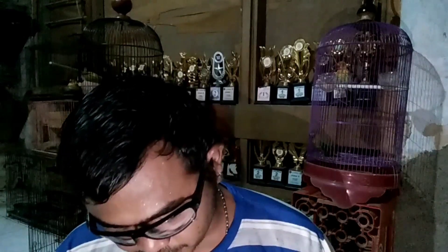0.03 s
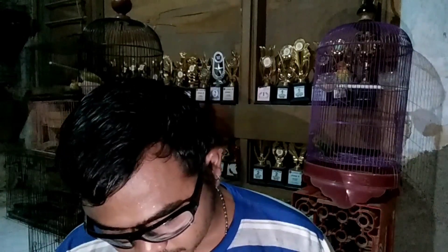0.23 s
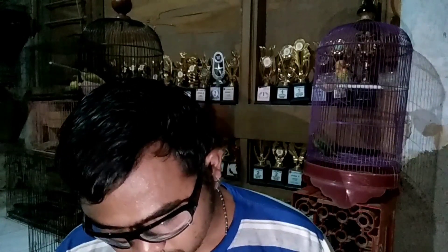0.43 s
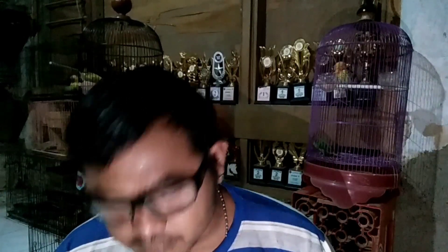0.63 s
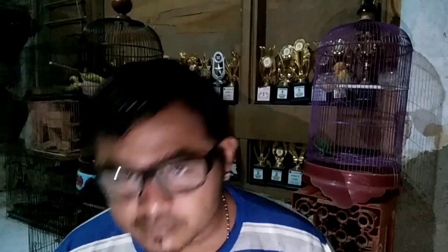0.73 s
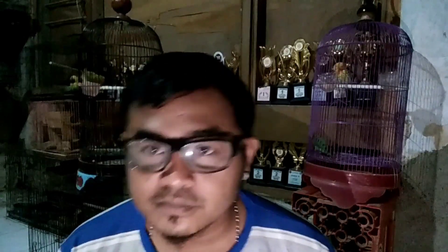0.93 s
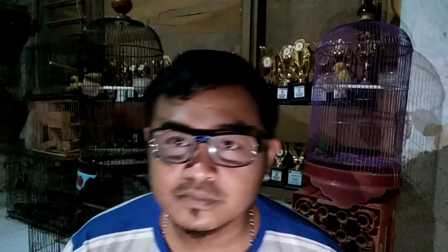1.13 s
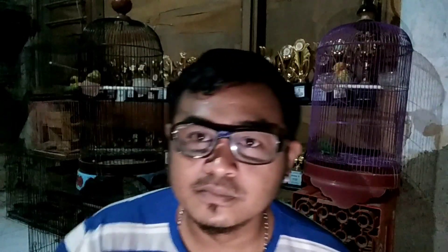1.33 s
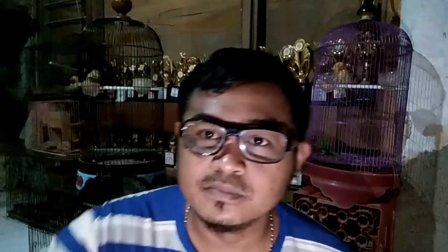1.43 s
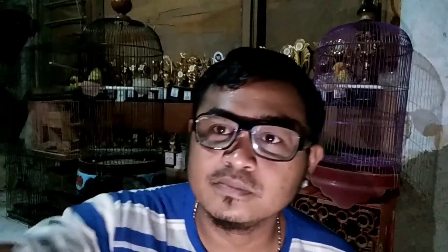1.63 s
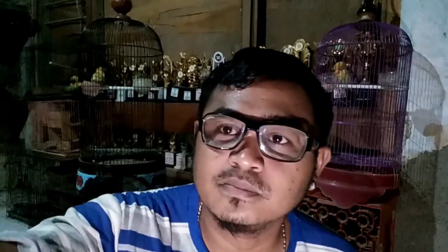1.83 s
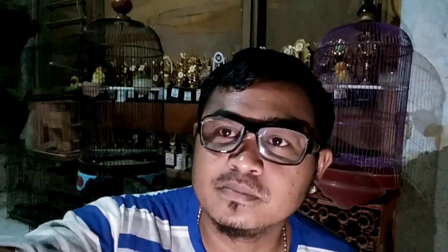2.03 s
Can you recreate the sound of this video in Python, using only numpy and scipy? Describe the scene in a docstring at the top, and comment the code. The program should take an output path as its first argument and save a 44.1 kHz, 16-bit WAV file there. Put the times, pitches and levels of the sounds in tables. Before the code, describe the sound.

Small caged parrots chirp sharply one at a time, with little cage clicks and faint rustling between, then break into dense shrill chatter until the end, over a quiet insect-like trill and low room rumble.

```python
"""Lovebirds call in a small hard-walled room with cages: five separate shrill chirps, then a loud run of
overlapping whistles and squawks. Each call is a gliding harmonic oscillator, frayed by random modulation;
squawks add throat resonances and rasping noise. Between calls the cages tick (noise cracks and decaying
modes) and rustle (swelling noise bands). Behind lie a thin, softly pulsing trill like a cricket's, made of
gated noise, faint low tones and a low room rumble of shaped noise."""
import sys
import numpy as np
from scipy import signal
from scipy.fft import rfft, irfft, next_fast_len
from scipy.io import wavfile
from scipy.ndimage import uniform_filter1d, minimum_filter1d, map_coordinates

SR = 44100
rng = np.random.default_rng(int(sys.argv[2]) if len(sys.argv) > 2 else 0)


def store_pcm(level_fs):
    """Save levels as 16-bit WAV."""
    pcm = np.round(np.clip(level_fs, -1, 1) * 32767).astype(np.int16)
    wavfile.write(sys.argv[1], SR, np.atleast_2d(pcm).T)


N = 92036

# Chirps whose pitch flicks. Each row: start in seconds, length in seconds, top pitch in Hz, time of the top
# in seconds, half-width of the flick in seconds, landing pitch in Hz (both pitches before the sag),
# level in dB, roughness (1 = full), overtones in dB.
FLICKED_CHIRPS = [ (0.329, 0.033, 7410, 0.0085, 0.0021, 5737, -14, 0.35, -26.5),
                  (0.713, 0.02, 7170, 0.0019, 0.00165, 5100, -13.5, 0.4, -23),
                  (0.8665, 0.0303, 6590, 0.0013, 0.00314, 5200, -13.5, .65, -15)]
# Held and gliding whistles. Each row: start in seconds, length in seconds, start, middle and end pitch in Hz,
# level in dB, roughness (1 = full), overtones in dB.
WHISTLE_NOTES = [ (.592, 0.026, 6070, 5980, 5825, -22.5, 0.09, -21.5),
                 (1.007, .025, 4296, 4274, 4426, -18, 0.31, -5.5),
                 (1.485, 0.0174, 3550, 3442, 3320, -17, 0.35, -16.5),
                 (1.503, 0.012, 3505, 3366, 3330, -10.5, 0.19, -47),
                 (1.553, 0.0307, 3296, 3320, 3530, -14.5, 0.29, -15.5),
                 (1.571, 0.0563, 3772, 3848, 3890, -19, 0.3, -8),
                 (1.584, 0.079, 4448, 4400, 4410, -18.5, 0.14, -19),
                 (1.582, 0.04, 4775, 4910, 5050, -23, 0.61, -25),
                 (1.823, 0.041, 6100, 6080, 6160, -27, 0.31, -10),
                 (1.626, 0.0257, 5510, 5920, 5680, -26.5, 0.4, -27),
                 (1.659, 0.074, 4203, 4000, 4013, -19.5, 0.62, -5.5),
                 (1.708, 0.0293, 4050, 4130, 4047, -13, 0.03, -22),
                 (1.739, .065, 4500, 4300, 4547, -17, 0.49, -11),
                 (1.815, 0.058, 4616, 4500, 4370, -16.5, 0.42, -17),
                 (1.877, 0.047, 4200, 3950, 3370, -16, 0.7, -40),
                 (1.929, 0.064, 7000, 7200, 7640, -24, 0.17, -46),
                 (1.946, .085, 5550, 5850, 5653, -19.5, 0.41, -12),
                 (2.054, 0.01, 4520, 4650, 4730, -14, 0.11, -51),
                 (2.065, 0.034, 4002, 4170, 4030, -12, 0.23, -34)]
# Colour of the whistle overtones by the beak. Each row: frequency in Hz, gain in dB.
BEAK_COLOUR = [(6000, 16), (7300, -4.5), (8800, -11), (10200, -0.5), (11500, -14), (13000, -19.5),
               (15000, 3)]
# Squawks. Each row: start in seconds, length in seconds, start, middle and end pitch in Hz, level in dB,
# roughness (1 = full), extra gain of the fundamental in dB, extra gain of the second harmonic in dB.
SQUAWK_NOTES = [ (0.985, 0.019, 2750, 2844, 2850, -24.5, 0.8, -6.5, -1),
                (0.992, .022, 2784, 2914, 2970, -20.5, 0.8, 0.5, 0),
                (1.407, 0.014, 1654, 1770, 1880, -30, 0.25, 14.5, 10),
                (1.419, 0.033, 1860, 1896, 2060, -24.5, 0.82, 15, 21),
                (1.43, 0.04, 2170, 2267, 2248, -19.5, 0.23, 11, -3),
                (1.458, 0.035, 2350, 2430, 2429, -15, 0.18, 17.5, -3.5),
                (1.525, 0.025, 2117, 2171, 2280, -19.5, 0.45, 15.5, -10),
                (1.638, 0.046, 2339, 2468, 2600, -15, 0.68, 2.5, 4.5),
                (1.644, 0.031, 1874, 1947, 2020, -29.5, 0.3, 1.5, -2),
                (1.661, 0.043, 2763, 2900, 3050, -21, 0.56, 12.5, 10),
                (1.716, 0.043, 3004, 3100, 3340, -24.5, 0.65, 3.5, 6),
                (1.756, .04, 3420, 3387, 3094, -17.5, 0.67, 16.5, 12),
                (1.792, 0.0554, 1542, 1693, 1630, -31, .45, -6, -2),
                (1.817, 0.081, 2520, 2515, 2694, -26, 1.15, -9, 5),
                (1.858, 0.085, 3130, 2781, 2224, -20.5, 0.74, 9, 2),
                (1.918, 0.083, 2268, 2377, 2708, -18, 0.72, 4, 10.5),
                (1.929, 0.065, 2775, 2893, 3050, -16.5, 0.73, 5, 8),
                (2.003, 0.074, 3016, 2830, 2626, -19.5, 0.8, 9, 9.5),
                (1.996, 0.11, 2094, 2086, 2091, -17.5, 0.79, -16.5, 6)]
# Resonance of the bird's throat and beak. Each row: frequency in Hz, gain in dB.
THROAT_RESPONSE = [(1000, -24), (1700, 14), (2300, -8), (4500, 1), (7300, -1), (8700, -10), (11000, -17),
                   (13500, -26), (15500, -21)]
# Spectrum of the airy rasp in a squawk. Each row: frequency in Hz, level in dB.
RASP_SPECTRUM = [(700, -12), (1500, 7.5), (2400, 17), (4500, -29.5), (7500, 34.5), (10000, -35.5),
                 (13000, -85), (15500, -65)]
# Decay of the room. Each row: frequency in Hz, time to fall 60 dB in seconds.
ROOM_DECAY = [(300, 0.53), (2000, 0.25), (5000, 0.31), (9000, 0.27), (15000, 0.26)]
# Ticks on the cage, duller when softer. Each row: start in seconds, level in dB, level of the longer ring
# in dB relative to the tick, upper corner of the crack in Hz.
CAGE_TICKS = [(0.5502, -10, -22, 13000), (0.7158, -15.5, -17.5, 6000), (1.028, -26, -9.5, 5000),
              (1.248, -25, -2.5, 5500)]
# Modes the cage rings with. Each row: frequency in Hz, level in dB, time to fall 60 dB in seconds.
CAGE_MODES = [(1625, -9, 0.016), (5230, -8.5, 0.011), (6200, 5.5, 0.0033), (7280, -0.5, 0.005)]
# Spectrum of the crack of a tick. Each row: frequency in Hz, level in dB.
CRACK_SPECTRUM = [(400, -40), (1000, -22), (1700, 8), (6500, 6.5), (9000, -1), (15500, -17)]
# Soft rustles. Each row: centre in seconds, half-length in seconds, level in dB, scratchy treble in dB
# relative to the body.
SOFT_RUSTLES = [(0, 0.021, -46.5, 6.5), (0.102, 0.041, -60, 5.5), (0.395, 0.035, -42.5, -7),
                (0.7, 0.0098, -41.5, 8), (0.773, 0.06, -50, -2), (0.885, 0.015, -38, 8.5),
                (0.948, 0.017, -43.5, 5.5), (1.026, 0.013, -46.5, 3), (1.083, 0.018, -50, 14.5),
                (1.176, 0.012, -55, 8), (1.253, 0.012, -46, -3)]
# Spectrum of the rustles' body. Each row: frequency in Hz, level in dB.
RUSTLE_BODY = [(300, -29), (700, -12.5), (1000, -11), (1260, 11), (1600, 3), (2100, 2), (2900, -12.5),
               (6000, -23.5)]
# Spectrum of the rustles' scratchy treble. Each row: frequency in Hz, level in dB.
RUSTLE_SCRATCH = [(1000, -47), (2000, -24), (3000, 2.5), (5000, 6), (8000, 3), (11000, -32), (15500, -30)]
# Spectrum of the trill and its chorus. Each row: frequency in Hz, level in dB.
TRILL_SPECTRUM = [(3000, -78), (5500, -35), (6500, -19.5), (7080, -2), (7600, -20), (8500, -44.5),
                  (12500, -56), (14500, -50.5), (16000, -46)]
# Faint low tones. Each row: centre in seconds, half-length in seconds, pitch in Hz, level in dB.
FAINT_LOW_TONES = [(1.008, 0.12, 400.6, -60.5), (1.764, 0.016, 316, -41.5)]
# Spectrum of the room's rumble. Each row: frequency in Hz, level in dB.
FLOOR_SPECTRUM = [(20, -29), (45, -12.5), (75, 1), (150, 0.5), (300, -7.5), (550, -16), (900, -17),
                  (1270, -13.5), (2000, -23), (4000, -25), (8000, -26.5), (12000, -51.5), (16000, -38)]

ATTACK_S, SQUAWK_ATTACK_S, RELEASE_S = 0.0026, 0.00385, 0.00179
# At full roughness: jitter as a share of the pitch, shimmer in dB, fuzz as a share of a partial.
# Rates are in random knots a second.
JITTER, SQUAWK_JITTER, JITTER_RATE = 0.0924, 0.0645, 900
SHIMMER_DB, SHIMMER_RATE = 3.5, 278
PARTIAL_FUZZ, FUZZ_RATE = 0.79, 750
CHIRP_SAG_HZ_PER_S, CHIRP_FADE_DB_PER_S, FLICK_LIFT_DB = 3500, 120, 4
OVERTONE_FALL_DB = 9.5  # per harmonic above the second
SQUAWK_RASP_DB, SQUAWK_LOW_HZ = -9, 1845  # rasp at full roughness; low-cut corner
FLUTTER_HZ, FLUTTER_DB = 132, 5  # depth at full roughness
WALL_FIRST_S, WALL_LAST_S = .004, .018
BIRD_WALLS_DB, CHIRP_WALLS_DB = -8, 4.5
ROOM_DELAY_S = 0.0092
BIRD_DIRECT_DB, SQUAWK_DIRECT_DB = 1.5, -0.5
BIRD_ROOM_DB, CHIRP_ROOM_DB, TICK_ROOM_DB, TRILL_ROOM_DB = -3.5, -0.5, -19.5, -4
CRACK_DB, CRACK_T60_S = -6.5, 0.013
CAGE_RING_HZ, CAGE_RING_T60_S = 1279, 0.042
TRILL_DB, CHORUS_DB, CHIRP_SPREAD_DB = -49.5, -55.5, 1.5
TRILL_FIRST_S, TRILL_PERIOD_S, SYLLABLE_S, TRILL_RISE_S = .059, .1125, .023, 0.013
FLOOR_DB = -56
CEILING, LIMITER_S, TOP_HZ = .93, .002, 15700


def chirps():
    """Rapid frequency modulation: pitch flicks up and whips down in milliseconds, then sags as it fades."""
    out, t = np.zeros(N), np.arange(SR // 10) / SR
    for s, length, top_hz, top_s, half, landing_hz, db, rough, overtones_db in FLICKED_CHIRPS:
        flick = swell(t, top_s, half)
        hz = landing_hz + (top_hz - landing_hz) * flick - CHIRP_SAG_HZ_PER_S * t
        # the pitch is steadiest at the top of the flick
        jitter = JITTER * rough * (1 - flick) * wobble(t, JITTER_RATE)
        phase = 2 * np.pi * np.cumsum(hz * (1 + jitter)) / SR
        gate = np.clip(t / ATTACK_S, 0, 1) * np.clip((length - t) / RELEASE_S, 0, 1)
        level = amp(db + FLICK_LIFT_DB * flick - CHIRP_FADE_DB_PER_S * t)
        envelope = np.sin(np.pi / 2 * gate) ** 2 * level
        note = near_walls(envelope * whistle_tone(hz, phase, rough, overtones_db), CHIRP_WALLS_DB)
        add(out, s, in_room(note, BIRD_DIRECT_DB, CHIRP_ROOM_DB))
    return out


def whistles():
    """Near-sinusoidal oscillation: shrill notes with a strong fundamental and a few overtones."""
    out = np.zeros(N)
    for s, length, start, middle, end, db, rough, overtones_db in WHISTLE_NOTES:
        hz, phase, envelope = syrinx(length, (start, middle, end), rough, JITTER, ATTACK_S)
        tone = whistle_tone(hz, phase, rough, overtones_db)
        note = near_walls(amp(db) * envelope * tone, BIRD_WALLS_DB)
        add(out, s, in_room(note, BIRD_DIRECT_DB, BIRD_ROOM_DB))
    return out


def squawks():
    """Source and filter: a fluttering harmonic stack shaped by throat resonance, over an airy rasp."""
    out, air = np.zeros(N), noise(RASP_SPECTRUM)
    for s, length, start, middle, end, db, rough, first_db, second_db in SQUAWK_NOTES:
        hz, phase, envelope = syrinx(length, (start, middle, end), rough, SQUAWK_JITTER, SQUAWK_ATTACK_S)
        lift = {1: first_db, 2: second_db}
        tone = np.zeros(len(hz))
        for k in range(1, 9):
            gain = amp(along(THROAT_RESPONSE, k * hz) + lift.get(k, 0)) * (k * hz < SR / 2)
            tone += gain * partial(k * phase, rough)
        rasp = amp(SQUAWK_RASP_DB) * rough ** 2 * np.roll(air, rng.integers(N))[:len(hz)]
        beat = np.sin(2 * np.pi * FLUTTER_HZ * np.arange(len(hz)) / SR)
        flutter = unit(amp(FLUTTER_DB * rough * beat))
        note = near_walls(amp(db) * envelope * flutter * (unit(tone) + rasp), BIRD_WALLS_DB)
        add(out, s, in_room(note, SQUAWK_DIRECT_DB, BIRD_ROOM_DB))
    return filtered(out, lambda hz: 1 - 1 / (1 + (hz / SQUAWK_LOW_HZ) ** 10))


def syrinx(length, pitches, rough, jitter, attack_s):
    """Voiced oscillation: pitch, phase and envelope of an arched glide that trembles with roughness."""
    t = np.arange(SR // 6) / SR
    u = np.clip(t / length, 0, 1)
    start, middle, end = pitches
    arch = (2 * middle - start - end) * 2 * u * (1 - u)
    hz = start * (1 - u) + end * u + arch
    phase = 2 * np.pi * np.cumsum(hz * (1 + jitter * rough * wobble(t, JITTER_RATE))) / SR
    gate = np.clip(t / attack_s, 0, 1) * np.clip((length - t) / RELEASE_S + .5, 0, 1)
    shimmer = unit(amp(SHIMMER_DB * rough * np.tanh(wobble(t, SHIMMER_RATE))))
    return hz, phase, gate * shimmer


def whistle_tone(hz, phase, rough, overtones_db):
    """Harmonic superposition: a fundamental with three overtones."""
    overtones = sum(overtone(k, hz, overtones_db) * partial(k * phase, rough) for k in range(2, 5))
    return unit(partial(phase, rough) + overtones)


def overtone(k, hz, overtones_db):
    """Spectral tilt: gain of a whistle's k-th harmonic, coloured by the beak."""
    fall_db = OVERTONE_FALL_DB * (k - 2)
    return amp(overtones_db - fall_db + along(BEAK_COLOUR, k * hz)) * (k * hz < SR / 2)


def partial(phase, rough):
    """Random quadrature modulation: one partial spreads with roughness into a narrow band."""
    t = np.arange(len(phase)) / SR
    fuzz = PARTIAL_FUZZ * rough
    in_phase = (1 + fuzz * wobble(t, FUZZ_RATE)) * np.sin(phase)
    return in_phase + fuzz * wobble(t, FUZZ_RATE) * np.cos(phase)


def near_walls(x, walls_db, count=10):
    """Early reflection: echoes from the nearest walls thicken a note without making it louder."""
    echoes = np.zeros(SR // 20)
    times = rng.uniform(WALL_FIRST_S, WALL_LAST_S, count)
    for s, sign in zip(times, rng.choice([-1, 1], count)):
        echoes[round(s * SR)] += sign * amp(walls_db) / np.sqrt(count)
    echoes[0] = 1  # direct sound
    y = signal.fftconvolve(x, echoes)
    return y * np.linalg.norm(x) / np.linalg.norm(y)


def in_room(x, direct_db, room_db):
    """Reverberation: the direct sound plus a diffuse random tail, drawn anew for each sound."""
    hz, t, z = signal.stft(rng.standard_normal(SR // 2), SR, nperseg=256)
    decay = amp(-60 * t / along(ROOM_DECAY, hz)[:, None])
    tail = signal.istft(z * decay, SR, nperseg=256)[1]
    # silent for one delay, then rising over another
    tail *= np.clip(np.arange(len(tail)) / SR / ROOM_DELAY_S - 1, 0, 1)
    wet = signal.fftconvolve(x, tail)
    wet *= amp(room_db) * np.linalg.norm(x) / (np.linalg.norm(wet) + 1e-20)
    return wet + amp(direct_db) * np.pad(x, (0, len(wet) - len(x)))


def ticks():
    """Impact and modal decay: small dry contacts with a crack and a few milliseconds of cage ring."""
    out, t, hiss = np.zeros(N), np.arange(SR // 10) / SR, noise(CRACK_SPECTRUM)

    def fade(t60):
        """Exponential decay by 60 dB in t60 seconds."""
        return np.exp(-np.log(1000) * t / t60)

    for s, db, ring_db, top_hz in CAGE_TICKS:
        ring = np.zeros(len(t))
        for hz, level, t60 in CAGE_MODES:
            ring += amp(level) * fade(t60) * np.sin(2 * np.pi * (hz * t + rng.random()))
        ring += amp(ring_db) * fade(CAGE_RING_T60_S) * np.sin(2 * np.pi * CAGE_RING_HZ * t)
        burst = filtered(np.roll(hiss, rng.integers(N)), lambda hz: 1 / (1 + (hz / top_hz) ** 4))[:len(t)]
        crack = amp(CRACK_DB) * fade(CRACK_T60_S) * burst
        onset = np.clip(t / 0.00095, 0, 1)
        add(out, s, in_room(amp(db) * (ring + crack) * onset, 0, TICK_ROOM_DB))
    return out


def rustles():
    """Friction as band noise: soft swells, dull or scratchy, with an unsteady level."""
    t = np.arange(N) / SR
    body, scratch = noise(RUSTLE_BODY), noise(RUSTLE_SCRATCH)
    rustle = np.zeros(N)
    for s, half, db, treble_db in SOFT_RUSTLES:
        rustle += amp(db) * swell(t, s, half) * (body + amp(treble_db) * scratch)
    return rustle * amp(1.33 * wobble(t, 150))


def trill(count=3):
    """Amplitude-gated noise: regular chirps of three buzzy syllables over a steady chorus at one pitch."""
    t = np.arange(N) / SR
    syllable = ((t - TRILL_FIRST_S) % TRILL_PERIOD_S) / SYLLABLE_S
    gate = (syllable < count) * np.sin(np.pi * np.sqrt(syllable % 1)) ** 2
    rise = np.sqrt(np.clip(syllable * SYLLABLE_S / TRILL_RISE_S, 0, 1))
    spread = amp(CHIRP_SPREAD_DB * wobble(t, 16.0))
    scrape = gate * rise * spread * rng.standard_normal(N)
    song = unit(filtered(scrape, lambda hz: amp(along(TRILL_SPECTRUM, hz))))
    chorus = amp(CHORUS_DB) * noise(TRILL_SPECTRUM)
    return amp(TRILL_DB) * in_room(song, 0, TRILL_ROOM_DB)[:N] + chorus


def low_tones():
    """Simple harmonic motion: faint low sine tones that swell and die."""
    t = np.arange(N) / SR
    return sum(amp(db) * swell(t, s, half) * np.sin(2 * np.pi * hz * t)
               for s, half, hz, db in FAINT_LOW_TONES)


def rumble():
    """Stationary random noise: the room's steady, low-weighted rumble."""
    return amp(FLOOR_DB) * noise(FLOOR_SPECTRUM)


def amp(db):
    """Logarithmic level: decibels to gain."""
    return 10 ** (np.asarray(db) / 20)


def unit(x):
    """Mean power: scale to rms 1."""
    return x / np.sqrt(np.mean(x ** 2) + 1e-20)


def along(points, hz):
    """Logarithmic frequency: interpolate (Hz, value) points on a log axis."""
    f, v = np.transpose(points)
    return np.interp(np.log(hz + 1), np.log(f + 1), v)


def filtered(x, response):
    """Linear filtering: multiply the spectrum of x by a response of frequency."""
    m = next_fast_len(N + SR // 2)
    return irfft(rfft(x, m) * response(np.fft.rfftfreq(m, 1 / SR)), m)[:N]


def noise(spectrum):
    """Spectral shaping: white noise coloured by a spectrum, of rms 1."""
    return unit(filtered(rng.standard_normal(N), lambda hz: amp(along(spectrum, hz))))


def wobble(t, rate):
    """Band-limited randomness: a smooth random curve with rate knots a second."""
    return map_coordinates(rng.standard_normal(size=512), [t * rate], mode="wrap")


def swell(t, centre, half):
    """Gaussian envelope: a bell-shaped rise and fall."""
    return np.exp(-.5 * ((t - centre) / half) ** 2)


def add(out, s, x):
    """Superposition: mix x into out from time s in seconds."""
    i = max(0, round(s * SR))
    out[i:i + len(x)] += x[:max(0, N - i)]


def scene():
    """Superposition of birds, cages and room at one microphone."""
    birds = chirps() + whistles() + squawks()
    cages = ticks() + rustles()
    return (birds + cages + trill() + low_tones() + rumble())[None]


def record(dry):
    """Peak limiting and band limiting: tame the highest peaks, fade the close briefly, cut the top."""
    x, size = dry[0], int(LIMITER_S * SR)
    needed_gain = CEILING / np.maximum(np.abs(x), CEILING)
    gain = uniform_filter1d(minimum_filter1d(needed_gain, 2 * size), size)
    closing = np.clip(np.arange(N)[::-1] / (size / 2), 0, 1)
    return filtered(x * gain * closing, lambda hz: hz < TOP_HZ)[None]


dry = scene()
out = record(dry)
store_pcm(out)
```